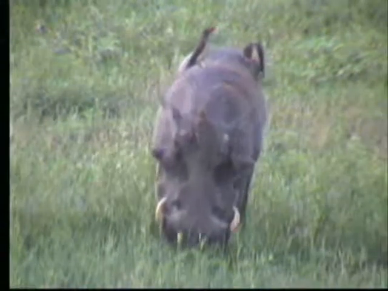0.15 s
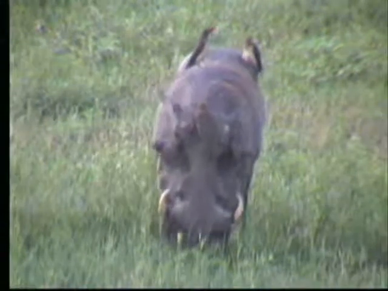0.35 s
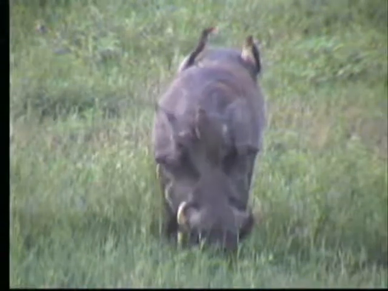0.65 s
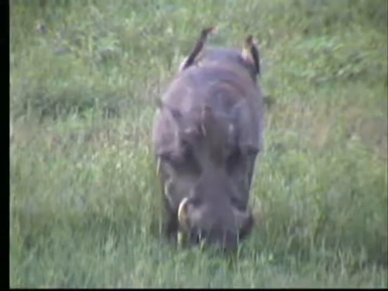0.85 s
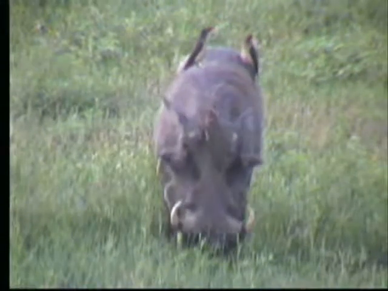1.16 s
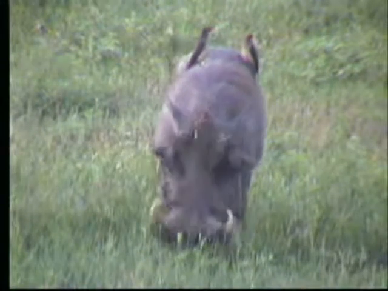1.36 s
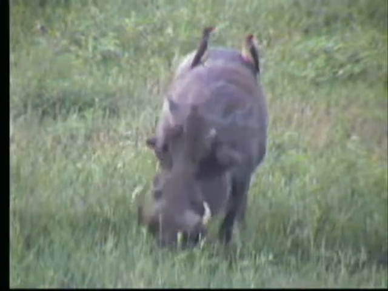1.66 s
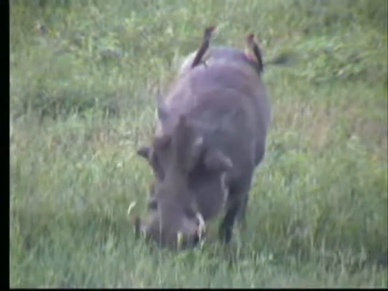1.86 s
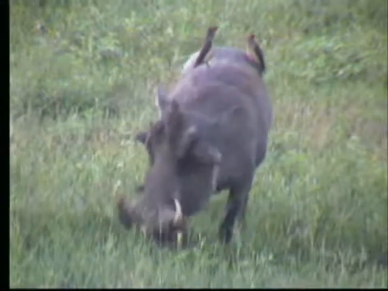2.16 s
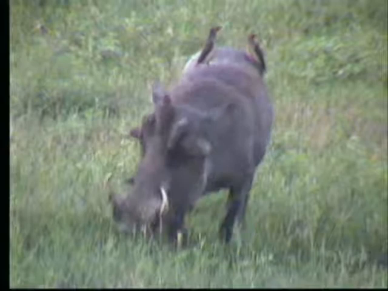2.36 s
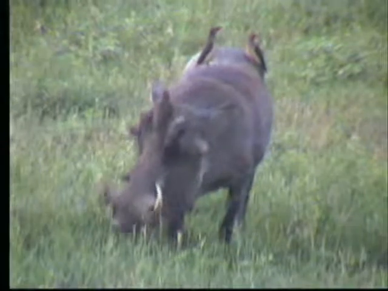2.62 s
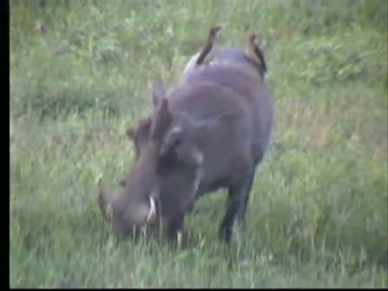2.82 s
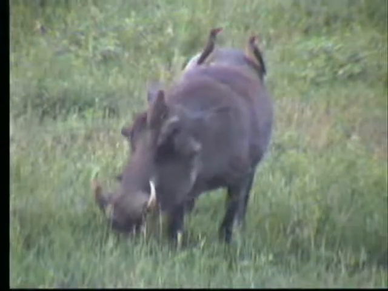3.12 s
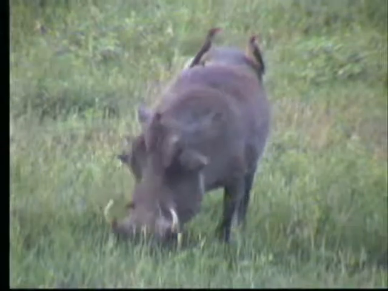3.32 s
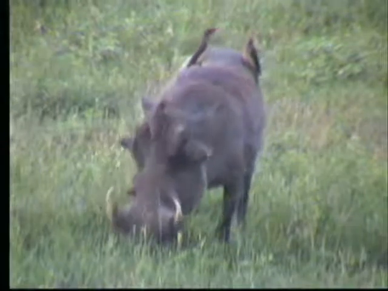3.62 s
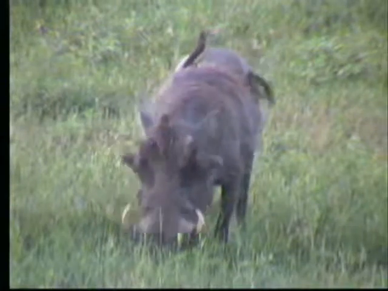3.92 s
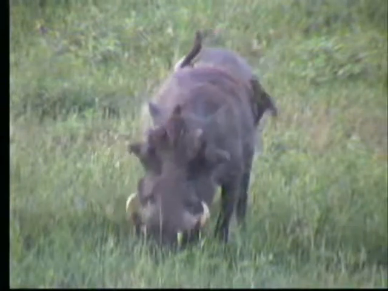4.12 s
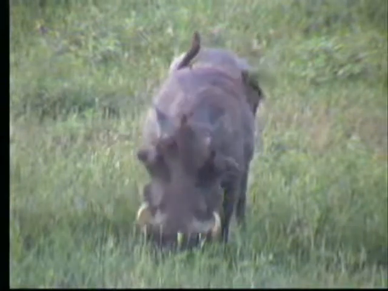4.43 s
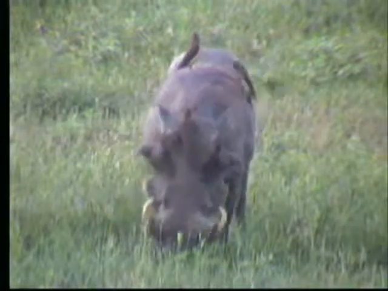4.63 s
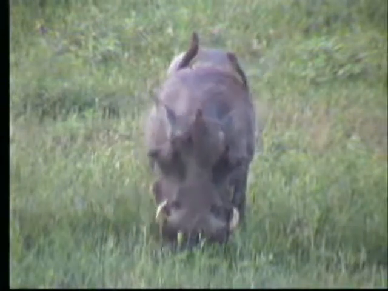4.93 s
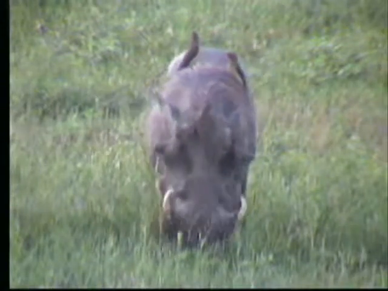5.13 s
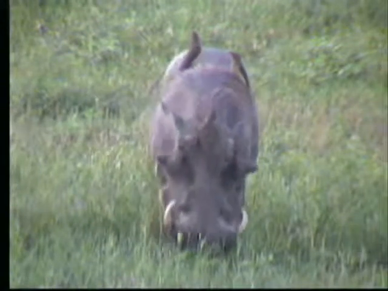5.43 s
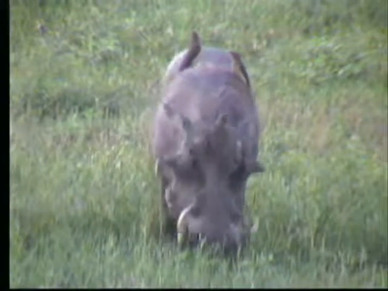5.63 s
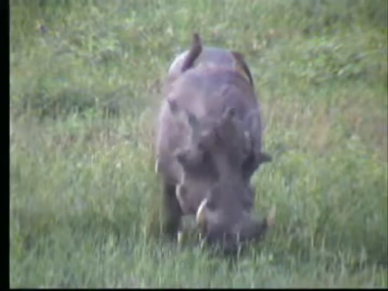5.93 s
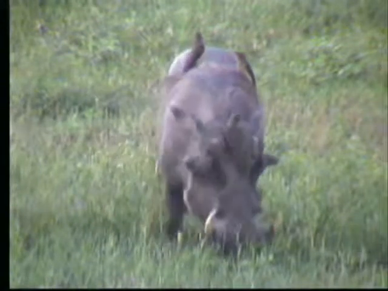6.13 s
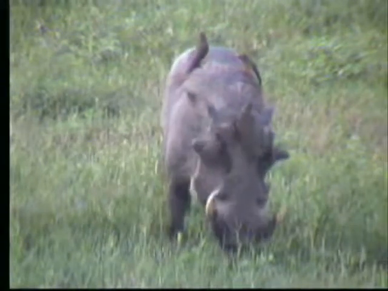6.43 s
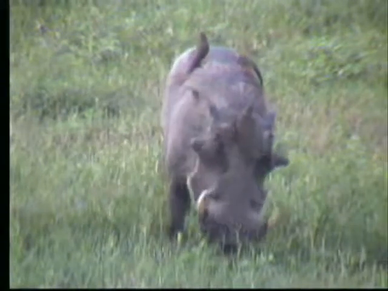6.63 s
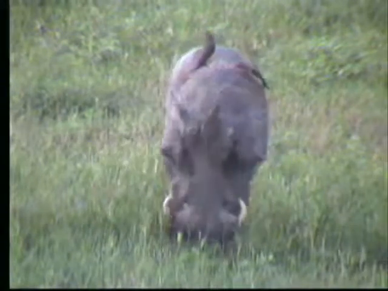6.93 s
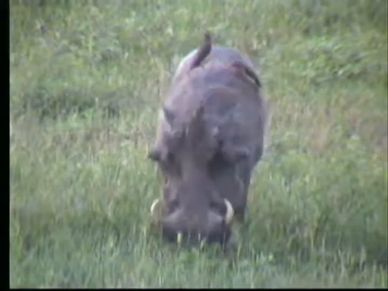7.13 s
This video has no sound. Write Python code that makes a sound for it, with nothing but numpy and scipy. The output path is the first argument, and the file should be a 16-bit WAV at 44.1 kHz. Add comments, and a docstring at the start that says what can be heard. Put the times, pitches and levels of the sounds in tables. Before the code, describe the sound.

Bright, buzzy-edged cricket chorus outdoors, two close chirpers dominating, with distant soft coos, hoarse clucks, thin whistles and quiet hiss underneath.

```python
"""Open grassland, where crickets sing: two loud chirpers close by and a third farther off, a higher
three-stroke chirper, swelling trills and a far chorus. Each wing stroke is a tone that sinks in pitch.
Farther off doves coo and purr with fluttering tones, another bird clucks in runs, a third whistles,
small birds twitter in quick sweeps, and faint peeps and a quiet hiss lie below.
A small camera samples it slowly and holds each sample, which mirrors the crickets into the treble."""
import sys
import numpy as np
from scipy import signal
from scipy.fft import rfft, irfft
from scipy.io import wavfile
from scipy.ndimage import map_coordinates

SR = 44100
rng = np.random.default_rng(int(sys.argv[2]) if len(sys.argv) > 2 else 0)


def log_audio(samples):
    """Write samples as a 16-bit WAV file to the path given in sys.argv[1]."""
    # one column per channel
    frames = np.atleast_2d(samples).T
    # limit to full scale, then quantise
    limited = np.clip(frames, -1, 1)
    pcm = np.round(limited * 32767).astype(np.int16)
    wavfile.write(sys.argv[1], SR, pcm)


N = 320607
TIME = np.arange(N) / SR
HOLD = 4  # the camera takes one sample out of this many and holds it


def from_db(db):
    """Turn decibels into an amplitude factor."""
    return 10 ** (np.asarray(db) / 20)


def rms_one(x):
    """Scale a sound to an average strength (RMS) of one."""
    return x / np.sqrt(np.mean(x ** 2) + 1e-20)


def in_time(rows):
    """Draw straight lines between (time, value) points over the whole scene."""
    return np.interp(TIME, *np.transpose(rows))


def add(out, start_s, sound):
    """Mix a sound in from start_s on, leaving out what falls outside the scene."""
    at = round(start_s * SR) + np.arange(len(sound))
    inside = (at >= 0) & (at < N)
    out[at[inside]] += sound[inside]


def progress(length_s):
    """Run from 0 to 1 over the length of a note."""
    return np.linspace(0, 1, max(int(length_s * SR), 8))


def wander(size, rate_hz):
    """Smooth chance with about rate_hz new values a second."""
    knots = np.arange(size) * rate_hz / SR
    return np.interp(knots + rng.random(), np.arange(256), rng.standard_normal(256))


def tone(pitch_hz):
    """A sine wave that follows a moving pitch from a random starting phase."""
    cycles = np.cumsum(pitch_hz) / SR
    return np.sin(2 * np.pi * (cycles + rng.random()))


def outdoors(x, wet_db, t60):
    """Grass and bushes scatter a diffuse tail that dies by 60 dB in t60 seconds."""
    t = TIME[:SR]
    fade = from_db(-60 * t / t60)
    build_up = 1 - np.exp(-t / 0.0035)
    tail = rng.standard_normal(SR) * fade * build_up
    tail = tail / np.sqrt(np.sum(tail ** 2))
    return x + from_db(wet_db) * signal.fftconvolve(x, tail)[:N]


def stroke(length_s, pitch_hz, fall_hz, bend, skew, jitter, point=1.15):
    """One closing of the wings: the scraper slows along the file, so the pitch sinks."""
    u = progress(length_s)
    # the given pitch is reached halfway through the stroke
    falling_hz = pitch_hz - fall_hz * (u ** bend - .5 ** bend)
    loudness = np.abs(np.sin(np.pi * u ** skew)) ** point
    return loudness * tone(falling_hz * (1 + jitter * wander(len(u), 925)))


# The chirps, and which cricket sings each
# columns: start_s (middle of first full stroke), level_db (approached by the end), strokes, singer
CHIRPS = [(.005, -25.5, 5, "far"), (.155, -8, 5, "clear"), (0.661, -10, 5, "raspy"), (.802, -8, 5, "clear"),
          (1.262, -8.5, 5, "raspy"), (1.362, -7.5, 5, "clear"), (1.816, -6, 5, "raspy"),
          (1.933, -7.5, 5, "clear"), (2.431, -6, 5, "raspy"), (2.578, -8.5, 5, "clear"),
          (3.049, -6, 5, "raspy"), (3.331, -7, 5, "clear"), (3.607, -22, 5, "far"),
          (3.745, -6.5, 5, "raspy"), (3.975, -7.5, 6, "clear"), (4.267, -22, 5, "far"),
          (4.440, -6, 5, "raspy"), (4.827, -7.5, 6, "clear"), (5.017, -7, 5, "raspy"),
          (5.456, -8, 5, "clear"), (5.582, -7, 5, "raspy"), (5.703, -21.5, 5, "far"),
          (6.038, -8, 5, "clear"), (6.172, -6, 5, "raspy"), (6.610, -8.5, 5, "clear"),
          (6.687, -21.5, 5, "far"), (6.976, -6.5, 5, "raspy"), (7.151, -29.5, 5, "far")]
# The wings and habits of each chirping cricket, by singer
# columns: final_pitch_hz, fall_hz (within a stroke, before scaling by its length), first_gap_s,
# swell_db, longest_stroke_s, rasp (0-1), peak_sharpness
SINGERS = {"clear": (4181, 286, .0153, 10, .0165, 0.0066, 0.93),
           "raspy": (4068, 717, .0168, 14.1, 0.024, 0.012, 1.47),
           "far": (4130, 420, .016, 9.4, .018, .01, 0.81)}
GAP_GROWTH_S = .0031  # each gap is this much longer than the one before
SHORTEST_SHARE = .48  # first stroke's length, as a share of the longest
SWELL_LEFT = 0.44  # share of the swell still to come after each stroke
CLIMB_SHARE = 0.29  # rise in pitch through a chirp, as a share of fall_hz
UNEVEN_DB, UNEVEN_HZ = 0.33, 14.6  # scatter of the strokes' level and pitch
FIRST_TOUCH_LOSS_DB = 9  # the first touch of the wings lies this far under the first stroke


def chirpers():
    """After a faint first touch, strokes grow longer, louder, higher and farther apart through a chirp."""
    out = np.zeros(N)
    for start_s, db, strokes, singer in CHIRPS:
        final_hz, fall_hz, gap_s, swell_db, longest_s, rasp, point = SINGERS[singer]
        for k in range(-1, round(strokes)):  # -1 is the first touch
            effort = np.clip(k / 4, 0, 1)
            share = SHORTEST_SHARE + (1 - SHORTEST_SHARE) * effort
            length_s = longest_s * share
            covered = (share / 0.55) ** 0.23  # a short stroke covers less of the file
            climb_left = (1 + np.cos(np.pi * effort)) / 2
            pitch_hz = final_hz - CLIMB_SHARE * fall_hz * climb_left + rng.normal(0, UNEVEN_HZ)
            sound = stroke(length_s, pitch_hz, fall_hz * covered, bend=2.92, skew=0.88,
                           jitter=rasp, point=point)
            if k >= 0:
                middle_s = start_s + k * gap_s + GAP_GROWTH_S * k * (k - 1) / 2
                level_db = db - swell_db * SWELL_LEFT ** k
            else:
                middle_s = start_s - gap_s
                level_db = db - swell_db - FIRST_TOUCH_LOSS_DB
            level = from_db(level_db + rng.normal(0, UNEVEN_DB))
            add(out, middle_s - length_s / 2, level * sound)
    return outdoors(out, wet_db=-14, t60=.15)


# The higher cricket keeps a beat for a few chirps, then hesitates
# columns: first_chirp_s, last_chirp_s, chirps
TRIPLET_RUNS = [(.023, .259, 2), (.463, 1.147, 4), (1.356, 1.554, 2), (1.787, 2.285, 3), (2.491, 2.908, 3),
                (3.139, 4.234, 6), (4.482, 5.165, 4), (5.374, 6.239, 5), (6.494, 7.162, 4)]
# The three strokes of each of its chirps, with a little scatter to come
# columns: delay_s, level_db, pitch_hz
TRIPLET_STROKES = [(0, -21.5, 5100), (0.029, -18, 5080), (.060, -18.5, 5150)]
TRIPLET_STROKE_S = .019


def triplet_chirper():
    """A higher cricket closes its wings three times per chirp, with nearly even strokes."""
    out = np.zeros(N)
    for first_s, last_s, chirps in TRIPLET_RUNS:
        for start_s in np.linspace(first_s, last_s, round(chirps)):
            for delay_s, db, pitch_hz in TRIPLET_STROKES:
                sound = stroke(TRIPLET_STROKE_S, pitch_hz + rng.normal(0, 8.2), fall_hz=380,
                               bend=2.32, skew=1.0, jitter=0.0022)
                level = from_db(db + rng.normal(0, 0.51))
                add(out, start_s + delay_s - TRIPLET_STROKE_S * 0.55, level * sound)
    return outdoors(out, wet_db=-7.5, t60=0.13)


# The trills, timed by their last and loudest stroke
# columns: last_stroke_s, level_db, swell_db (steepness of the swell; below 0 counts as none)
TRILLS = [(.168, -14, .3), (0.801, -29, .5), (1.063, -26.5, .1), (1.405, -14, 1.5), (1.957, -25.5, 0.5),
          (2.429, -15, 1), (3.018, -24.5, 1.5), (3.362, -14.5, 1.5), (3.951, -23.5, 1), (4.335, -15.5, 1),
          (4.904, -29, 1.5), (5.265, -16, 1.5), (5.885, -29.5, -0.3), (6.046, -14, 1), (6.699, -28, 4),
          (6.895, -15, .5)]
TRILL_GAP_S = .0487
TRILL_HZ, TRILL_AT_DB, TRILL_HZ_PER_DB = 4980, -14, 18.5  # a louder trill is also higher


def trillers(count=7):
    """Slow, steeply falling strokes climb, and mostly swell, towards the end of the trill."""
    out = np.zeros(N)
    for last_s, db, swell_db in TRILLS:
        last_hz = TRILL_HZ + TRILL_HZ_PER_DB * (db - TRILL_AT_DB)
        for left in range(count):  # strokes left until the last
            pitch_hz = last_hz - 35 * left + rng.normal(0, 27)
            sound = stroke(0.022, pitch_hz, fall_hz=954, bend=0.98, skew=1.0, jitter=0.014)
            level_db = db - max(swell_db, 0) * left ** 2 / 3
            add(out, last_s - left * TRILL_GAP_S - .010, from_db(level_db) * sound)
    return outdoors(out, wet_db=-9.5, t60=0.19)


# Rise and fall of the far chorus
# columns: time_s, level_db (before the lift of CHORUS_DB)
CHORUS = [(0.0, -30.5), (0.51, -42), (0.91, -32.5), (1.8, -39), (2.41, -32), (2.77, -38.5), (3.26, -30),
          (3.4, -43), (3.62, -38.5), (4.01, -32.5), (4.61, -35.5), (5.02, -30.5), (5.41, -39),
          (5.87, -30.5), (6.3, -40), (6.82, -30), (6.99, -36), (7.27, -38)]
CHORUS_DB = 1


def far_chorus(count=900):
    """Many distant crickets of the high kinds, their strokes blurred together by a long tail."""
    out = np.zeros(N)
    for when, pitch, size in rng.random((count, 3)):
        sound = stroke(0.0169, 4450 + 800 * pitch ** .7, fall_hz=474, bend=1.41, skew=1.0, jitter=0.0035)
        add(out, when * N / SR, from_db(10 * size) * sound)
    blurred = outdoors(out, wet_db=-5.5, t60=0.41)
    return from_db(in_time(CHORUS) + CHORUS_DB) * rms_one(blurred)


def coo(length_s, first_hz, last_hz, purr):
    """One soft, gliding note; the throat's flutter roughens it into a purr (depth 0-1)."""
    u = progress(length_s)
    flutter = tone(70 * (1 + .15 * wander(len(u), 89.7)))  # about 70 beats a second
    waver = (.03 + .04 * purr) * wander(len(u), 330) + .08 * purr * flutter
    # a deep purr also lowers the pitch by up to a twentieth
    pitch_hz = (first_hz + (last_hz - first_hz) * u) * (1 + waver - .05 * purr)
    throat = (1 + purr * flutter) / np.sqrt(1 + purr ** 2 / 2)
    soft_ends = np.abs(np.sin(np.pi * u)) ** 0.038
    return from_db(2) * soft_ends * throat * tone(pitch_hz)


# Phrases of the doves: an opening coo, a falling coo and a long purr
# columns: purr_start_s, level_db (before coo's 2 dB lift), purr_length_s, opening_db (above level_db)
DOVE_PHRASES = [(0.689, -53.5, 0.12, -12), (1.193, -44, .46, -25), (2.309, -56, 0.38, -20),
                (3.049, -45, .5, -17), (4.221, -51, .28, 2.5), (4.865, -46.5, 0.57, -13),
                (6.68, -46, .51, -1.5)]
# Low hoots of another dove
# columns: start_s, length_s, level_db (before coo's 2 dB lift)
HOOTS = [(4.606, .12, -56), (5.386, 0.08, -55.5), (7.124, .18, -52.5)]


def dove():
    """Doves repeat a phrase of two short coos and a fluttering purr; another hoots lower."""
    out = np.zeros(N)
    for purr_s, db, length_s, opening_db in DOVE_PHRASES:
        opening = coo(.077, first_hz=1005, last_hz=840, purr=.36)
        add(out, purr_s - .582, from_db(db + opening_db) * opening)
        falling = coo(.098, first_hz=1062, last_hz=852, purr=0.533)
        add(out, purr_s - .293, from_db(db + 1.5) * falling)
        long_purr = coo(length_s, first_hz=920, last_hz=900, purr=.96)
        add(out, purr_s, from_db(db) * long_purr)
    for start_s, length_s, db in HOOTS:
        add(out, start_s, from_db(db) * coo(length_s, first_hz=608, last_hz=568, purr=.4))
    return outdoors(out, wet_db=-0.5, t60=0.27)


# Runs of evenly spaced clucks
# columns: first_s, last_s, clucks, first_level_db, last_level_db, pitch_hz (top of the arch)
CLUCK_RUNS = [(1.351, 1.35, 1, -42.5, -43, 1324), (3.295, 4.11, 6, -50, -48, 1233),
              (4.275, 4.60, 3, -41.5, -38, 1139), (4.737, 5.185, 4, -41, -39.5, 1137),
              (5.375, 5.375, 1, -43.5, -43, 1160), (5.78, 5.89, 3, -37, -37.5, 1121),
              (6.005, 6.728, 6, -41, -41.5, 1138), (6.92, 7.08, 2, -46, -50, 1185)]


def clucker():
    """Runs of short hoarse notes that arch in pitch, with a weak upper partial."""
    out, u = np.zeros(N), progress(0.0609)
    arch = np.abs(np.sin(np.pi * u))
    for first_s, last_s, clucks, first_db, last_db, top_hz in CLUCK_RUNS:
        for start_s, db in np.linspace((first_s, first_db), (last_s, last_db), round(clucks)):
            hoarse = .09 * wander(len(u), 600)
            pitch_hz = top_hz * (1 + 0.154 * (arch - 1) + hoarse)
            voice = tone(pitch_hz) + from_db(-12.0) * tone(1.45 * pitch_hz)
            add(out, start_s - .027, from_db(db) * arch * voice)
    return outdoors(out, wet_db=-1, t60=0.26)


# Whistled notes
# columns: start_s, length_s, level_db (before the unevenness)
WHISTLES = [(.638, .055, -41), (.862, .315, -39.5), (4.624, .042, -42), (4.82, .055, -39.5),
            (5.03, .28, -42), (6.84, .041, -44)]
WHISTLE_HZ, WHISTLE_SAG_HZ = 2269, 35  # pitch it settles on, and how far above that it starts


def whistler():
    """Pure notes that sag a little and settle on one pitch, uneven in strength."""
    out = np.zeros(N)
    for start_s, length_s, db in WHISTLES:
        u = progress(length_s)
        pitch_hz = WHISTLE_HZ + WHISTLE_SAG_HZ * (1 - u) ** 3
        swell = np.abs(np.sin(np.pi * u)) ** .3
        uneven_db = 1.4 * wander(len(u), 35)
        add(out, start_s, from_db(db + uneven_db) * swell * tone(pitch_hz))
    return outdoors(out, wet_db=-8, t60=.7)


def sweep(glide_hz):
    """A scratchy note that swells and fades along a gliding pitch."""
    scratch = 1 + .02 * wander(len(glide_hz), 1500)
    swell = np.sin(np.linspace(0, np.pi, len(glide_hz)))
    return swell * tone(glide_hz * scratch)


# Bouts of twitter from small birds
# columns: start_s, length_s, level_db, pitch_hz (middle of the notes' spread), sweep_hz, notes_per_s
TWITTER = [(0.906, 0.22, -38, 3620, 400, 20), (2.678, 0.47, -43, 3350, 1354, 26),
           (3.15, .2, -40.5, 3414, 900, 26), (5.679, 0.27, -37, 3660, 1630, 45),
           (6.798, 0.48, -45.5, 3450, 704, 25)]
# Single slurred notes of small birds
# columns: start_s, length_s, first_pitch_hz, last_pitch_hz, level_db
SLURS = [(2.713, 0.046, 2580, 3560, -44), (2.88, .07, 2650, 3950, -40), (3.423, 0.091, 3900, 2980, -41),
         (3.62, .05, 3550, 3210, -41), (3.831, .09, 3950, 3330, -36), (4.293, .11, 3910, 3350, -39)]
TWITTER_NOTE_S = 0.045


def twitter():
    """Small birds throw out bouts of quick sweeps, up or down, and single slurs."""
    out, u = np.zeros(N), progress(TWITTER_NOTE_S)
    for start_s, length_s, db, middle_hz, sweep_hz, per_s in TWITTER:
        count = max(round(length_s * per_s), 1)
        for k, (late, pitch, turn) in enumerate(rng.random((count, 3))):
            direction = np.sign(turn - .5)  # up or down by chance
            glide_hz = middle_hz + 700 * (pitch - .5) + direction * sweep_hz * (u - .5)
            note_s = start_s + length_s * (k + late) / count
            add(out, note_s - TWITTER_NOTE_S / 2, from_db(db) * sweep(glide_hz))
    for start_s, length_s, first_hz, last_hz, db in SLURS:
        glide_hz = first_hz + (last_hz - first_hz) * progress(length_s)
        add(out, start_s, from_db(db) * sweep(glide_hz))
    return outdoors(out, wet_db=-2.5, t60=0.18)


PEEP_DB, PEEP_HZ = -53.5, 2884  # level of the faintest peep, and the pitch all waver around


def peeping(count=45):
    """Faint, hoarse peeps from far across the grass: short tones with a shaky pitch."""
    out, u = np.zeros(N), progress(0.03)
    for k, (late, size) in enumerate(rng.random((count, 2))):
        pitch_hz = PEEP_HZ * (1 + 0.033 * wander(len(u), 700))
        note = np.sin(np.pi * u) * tone(pitch_hz)
        add(out, (k + late) / count * N / SR, from_db(PEEP_DB + 10 * size) * note)
    return outdoors(out, wet_db=-7.0, t60=0.19)


# Colour of the still air and hiss
# columns: frequency_hz, relative_level_db (per Hz)
AIR = [(25, 2), (60, -1), (140, -0.5), (250, -3.5), (450, -4.5), (900, 0), (1500, -4), (2500, -3),
       (4000, 2), (5400, -15)]
AIR_DB = -48.5  # overall level


def air():
    """A steady, quiet hiss under everything: random noise coloured by frequency."""
    hz = np.maximum(np.arange(N // 2 + 1) * SR / N, 1)
    points = np.array(AIR)
    colour_db = np.interp(np.log(hz), np.log(points[:, 0]), points[:, 1])
    colour = from_db(colour_db) * (hz < SR / HOLD / 2)
    noise = irfft(rfft(rng.standard_normal(N)) * colour, N)
    return from_db(AIR_DB) * rms_one(noise)


def scene():
    """Mix the crickets, the birds and the air into one channel."""
    crickets = chirpers() + triplet_chirper() + trillers() + far_chorus()
    birds = dove() + clucker() + whistler() + twitter()
    return (crickets + birds + peeping() + air())[None]


# Moments when the camera's sample clock slips
# columns: time_s
SLIPS = [.165, 1.565, 2.463, 2.665, 3.065, 3.362, 3.765, 4.463, 4.865, 5.665, 6.265]
SLIP_SAMPLES = .75  # step back at each slip, in samples at SR
OFFSET = .0136  # constant shift of the waveform
CUTOFF_HZ = 15400


def record(dry):
    """Each slow sample is held, mirroring all tones upward; a clock slip ticks faintly; the top is cut."""
    slips_so_far = np.searchsorted(np.sort(SLIPS), TIME[::HOLD])
    clock = np.arange(0, N, HOLD) - SLIP_SAMPLES * slips_so_far
    samples = map_coordinates(dry[0], [clock], order=3, mode="nearest")
    held = np.repeat(samples, HOLD)[None, :N] + OFFSET
    top_cut = signal.ellip(10, .2, 70, CUTOFF_HZ, fs=SR, output="sos")
    return signal.sosfilt(top_cut, held)


dry = scene()
out = record(dry)
log_audio(out)
```